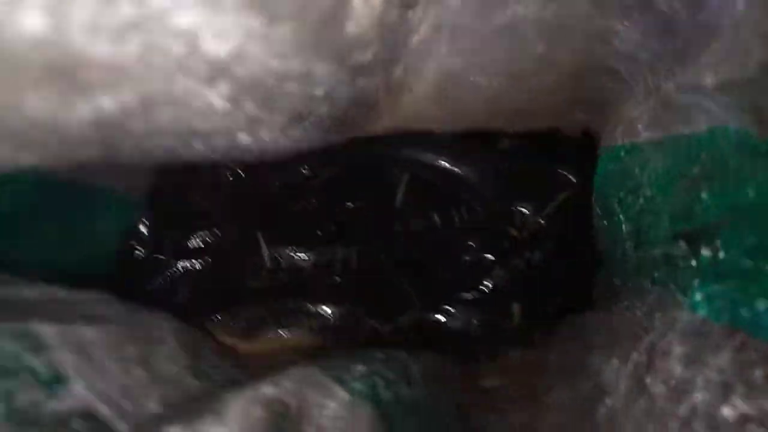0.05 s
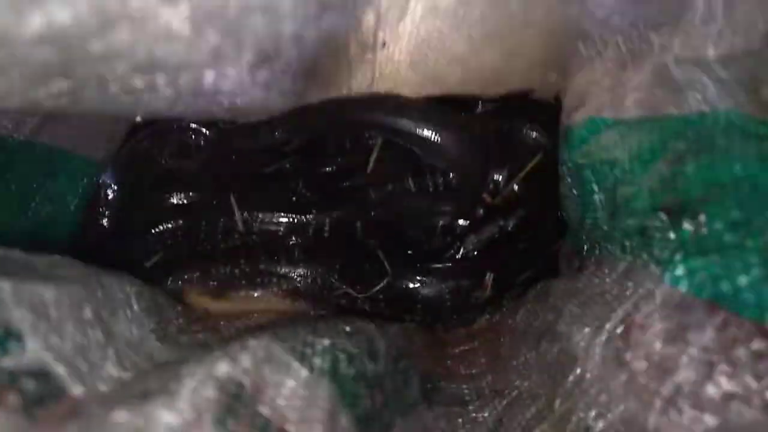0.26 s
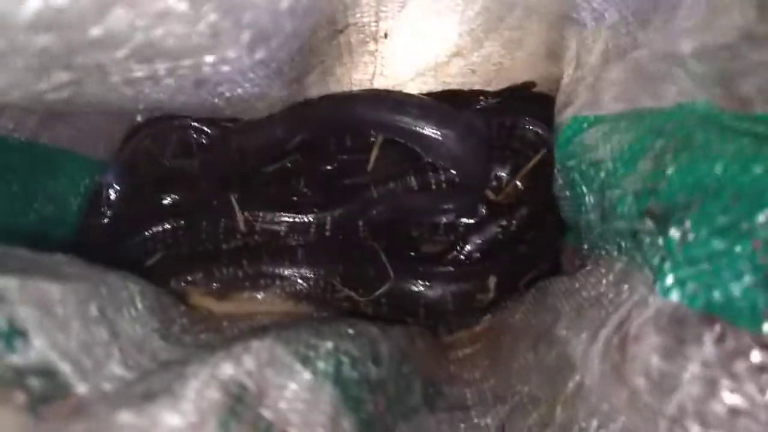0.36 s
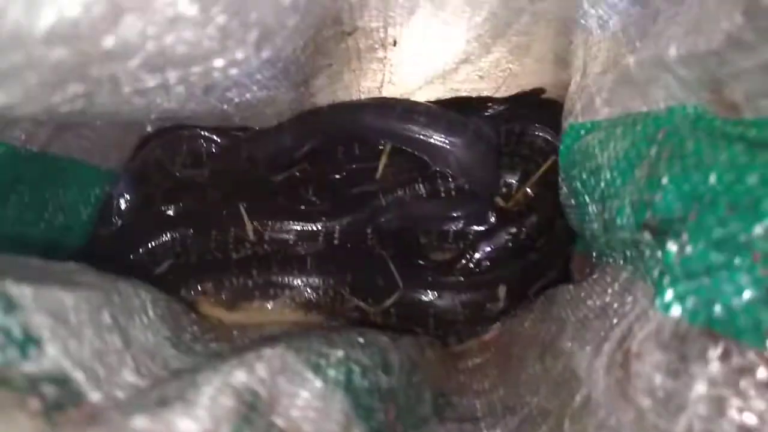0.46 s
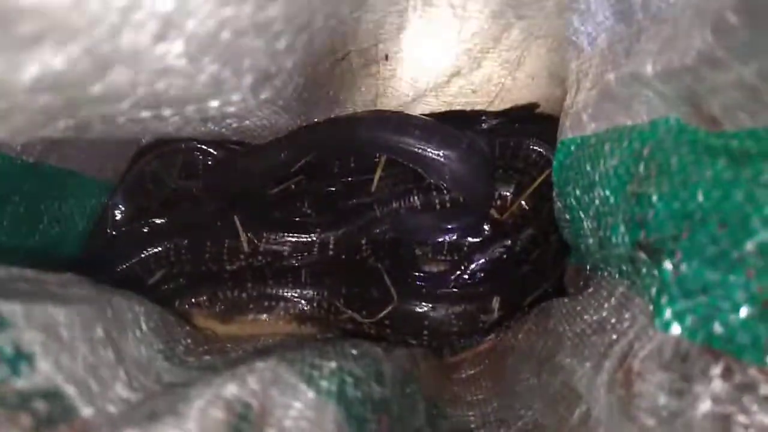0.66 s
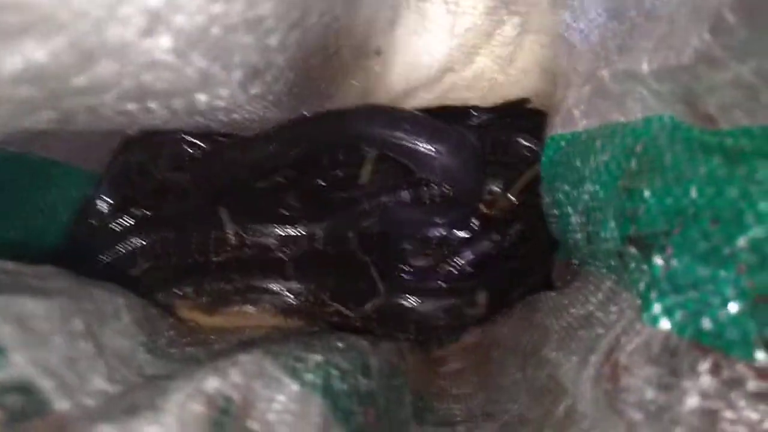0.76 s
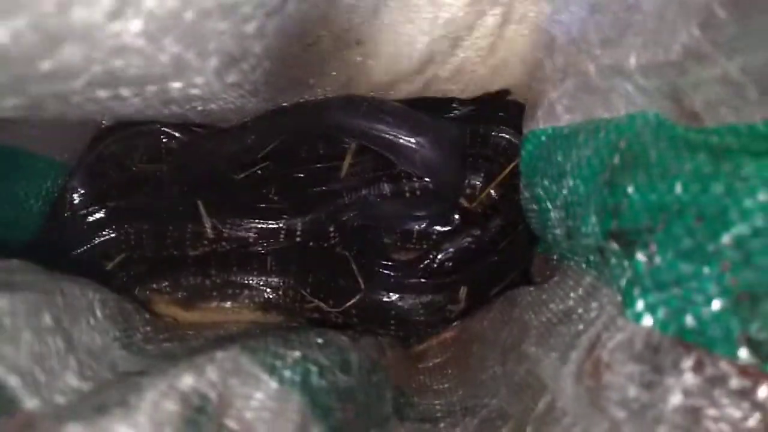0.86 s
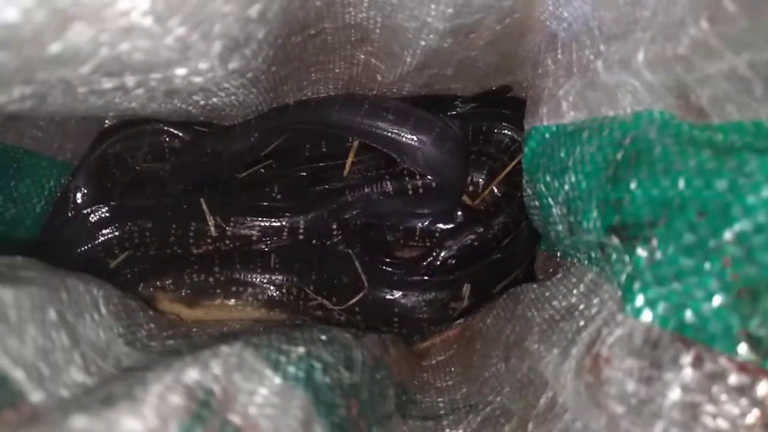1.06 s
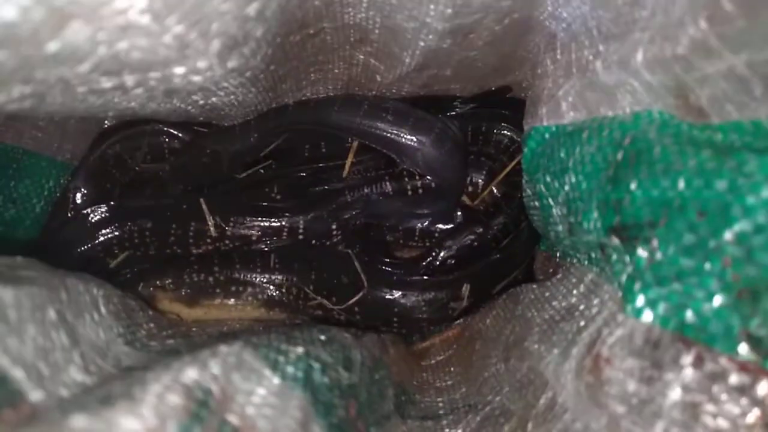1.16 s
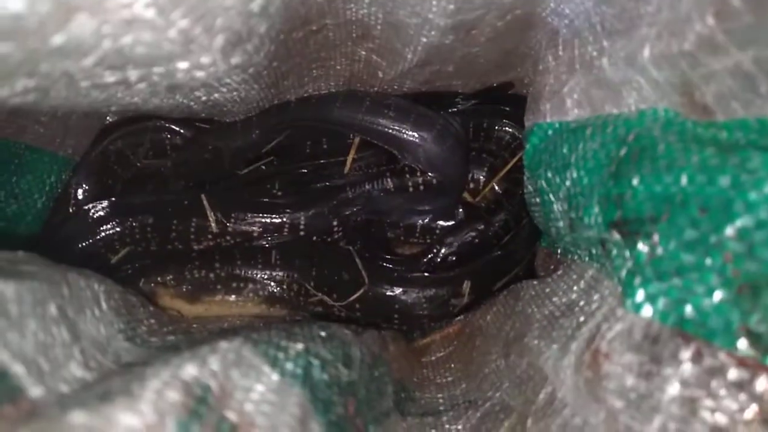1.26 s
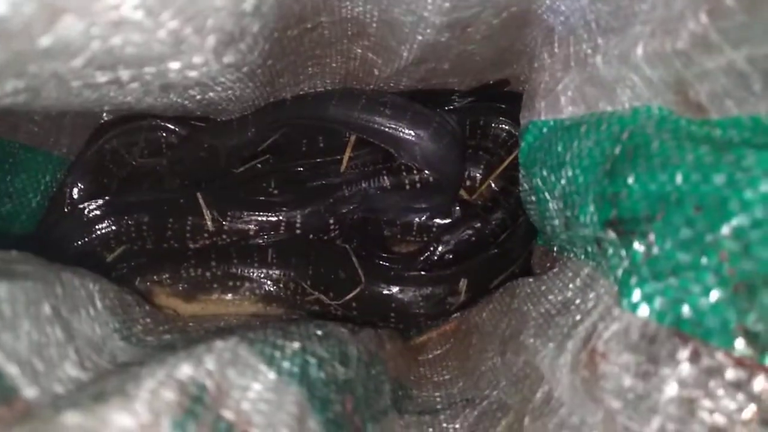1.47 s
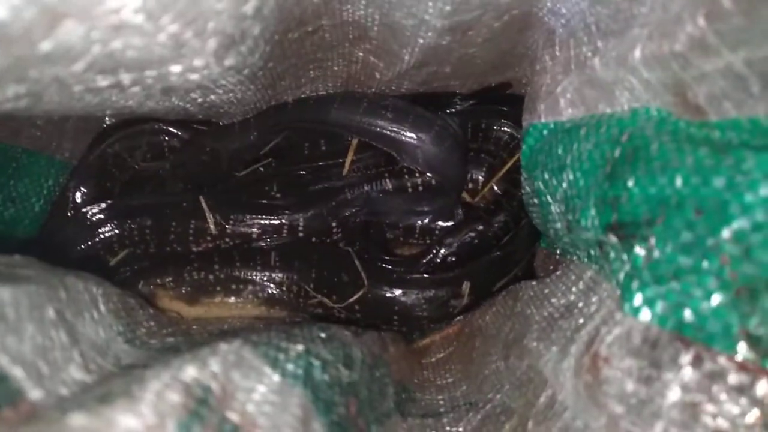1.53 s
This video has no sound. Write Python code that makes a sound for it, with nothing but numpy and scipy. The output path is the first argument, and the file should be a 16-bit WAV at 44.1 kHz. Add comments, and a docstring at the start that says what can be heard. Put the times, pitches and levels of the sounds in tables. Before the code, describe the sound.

Crickets chirp steadily at night, with a sharp microphone knock and light sack crinkles.

```python
"""Crickets sing at night around an open sack of fish, heard from a hand-held recorder.
Their wing strokes make short falling tones, scattered by plants; bush crickets buzz in swells.
A finger covers the right microphone, so the insects are on the left; on the right the finger
knocks, ticks and rasps over the port. The woven sack crinkles and the grip rumbles faintly."""
import sys
import numpy as np
from scipy import signal
from scipy.fft import rfft, irfft
from scipy.io import wavfile
from scipy.ndimage import uniform_filter1d

SR = 44100
rng = np.random.default_rng(int(sys.argv[2]) if len(sys.argv) > 2 else 0)


def store_pcm(level_fs):
    """Save levels as 16-bit WAV."""
    pcm = np.round(np.clip(level_fs, -1, 1) * 32767).astype(np.int16)
    wavfile.write(sys.argv[1], SR, np.atleast_2d(pcm).T)


N = 70560

# skin rubbing on the port (frequency [Hz], gain [dB])
SKIN_SPECTRUM = [(60, -22), (300, 1), (1000, -4), (1550, -5.5), (2150, 0), (2750, -3), (3500, -12.5),
                 (4500, -20), (8000, -38.5), (16000, -67)]
# woven plastic; also the knock's thin click (frequency [Hz], gain [dB])
SACK_SPECTRUM = [(150, -8.5), (1000, -10.5), (2200, -1.5), (3700, 3.5), (5000, 0.5), (6500, -1),
                 (8200, -0.5), (10000, -25), (13000, -22), (16000, -40)]


def near_crickets():
    """One cricket chirps in twos and threes, another pulses evenly; plants scatter both."""
    # (first syllable [s], syllables [count], level [dB])
    chirps = [(.461, 2, -50.5), (.648, 3, -49), (0.874, 3, -49), (1.092, 2, -47), (1.313, 3, -46.5),
              (1.533, 2, -46.5)]
    syllable_gap_s, pulse_gap_s, pulser_db = .033, .0843, -50
    chirper = sum(undb(db) * syllable(at + k * syllable_gap_s, hz=4975, width_s=.004, sag_hz_per_s=35000)
                  for at, count, db in chirps for k in range(count))
    chirper *= undb(2.5 * walk(900) - 1)  # fast level flutter
    pulser = sum(syllable(at, hz=7050, width_s=.0095, sag_hz_per_s=5600)
                 for at in np.arange(.022, N / SR, pulse_gap_s))
    return (scatter(chirper, wet_db=.5, decay_s=.009, delay_s=.004)
            + undb(pulser_db) * scatter(pulser, wet_db=-6, decay_s=.016, delay_s=.0022))


def syllable(at, hz, width_s, sag_hz_per_s):
    """One wing stroke: a tone that swells, fades more slowly and sags in pitch."""
    u = clock() - at
    envelope = np.exp(-(u / np.where(u < 0, width_s, 1.6 * width_s)) ** 2)
    return envelope * np.sin(2 * np.pi * (hz * u - sag_hz_per_s * u ** 2 / 2))


def chorus():
    """Far crickets trill in falling syllables, blurred by distance, over countless others."""
    # wash of insects and night air (frequency [Hz], gain [dB])
    night_spectrum = [(300, -30), (1000, -30.5), (1700, -35.5), (2700, -22), (3400, -27), (4100, -26),
                      (4800, -19), (5500, -16.5), (5900, -11.5), (6200, -4.5), (6950, -3.5), (7350, -21.5),
                      (8000, -15.5), (8900, -19), (9400, -48.5), (16000, -44.5)]
    # (pitch [Hz], syllable rate [1/s], level [dB])
    far_crickets = [(6280, 78, -58.5), (6820, 32, -65.5), (6570, 26, -63.5)]
    wash_db = -55.5 + 1.5 * walk(39)
    out = undb(wash_db) * noise(night_spectrum)
    for hz, per_s, db in far_crickets:
        stroke_phase = (rng.random() + np.cumsum(per_s * (1 + .033 * walk(3.7))) / SR) % 1
        pitch_hz = hz * (1 - .093 * (stroke_phase - .5) + .00398 * walk(90))
        trill = np.sin(np.pi * stroke_phase) ** 2 * np.sin(2 * np.pi * np.cumsum(pitch_hz) / SR)
        out += undb(db) * unit(scatter(trill, wet_db=2, decay_s=.028, delay_s=.001))
    return out


def bush_crickets():
    """Narrow bands of buzz that swell regularly."""
    # (pitch [Hz], bandwidth [Hz], one crest [s], period [s], crest level [dB])
    buzzers = [(8400, 360, 1.085, .088, -62.5), (5874, 570, 1.24, .275, -66.5)]
    out = np.zeros(N)
    for hz, width_hz, crest_s, period_s, db in buzzers:
        band = signal.butter(2, [hz - width_hz / 2, hz + width_hz / 2], "band", fs=SR, output="sos")
        buzz = unit(signal.sosfilt(band, rng.standard_normal(N)))
        swell = np.cos(np.pi * (clock() - crest_s) / period_s) ** 2
        out += undb(db) * swell * buzz
    return out


def finger_knock():
    """The finger strikes the right port: a ring, a push of air, soft bumps; a thin click on the left."""
    # strike and rebound (time [s], level [dB])
    knocks = [(.21805, 4.5), (.22135, -10)]
    # (frequency [Hz], gain [dB], time to crest [s])
    port_modes = [(640, -9, 0.00029), (2478, 0.5, 0.00022), (4033, -12.5, 0.00034), (8980, -31, 0.00032)]
    # air into the port (time [s], level [dB], decay [s])
    pushes = [(0.2186, -3.5, 0.0021), (0.2247, -26.5, 0.014)]
    # soft hand bumps (time [s], level [dB], pitch [Hz], time to crest [s])
    bumps = [(.0062, -36, 884, 0.0017), (0.0682, -24.5, 192, 0.0015), (0.2309, -26.5, 290, 0.0011)]
    push_rise_s = .00021
    port = sum(ring(at, db + mode_db, hz, crest_s)
               for at, db in knocks for hz, mode_db, crest_s in port_modes)
    for at, db, decay_s in pushes:
        u = np.maximum(clock() - at, 0)
        port += undb(db) * (np.exp(-u / decay_s) - np.exp(-u / push_rise_s))
    port += sum(ring(*bump) for bump in bumps)
    left_contacts = by_force([(at + .0005, db - 22.5) for at, db in knocks])
    click = ticks(left_contacts, SACK_SPECTRUM, tail_db=31, tail_s=.0015, vary_db=0)
    return np.array([click, port])


def finger_taps():
    """Light, dry ticks on the case beside the right port."""
    # (time [s], peak [dB])
    contacts = [(.0070, -25), (.0842, -29), (.0982, -14.5), (.1145, -33), (.1354, -31), (.1515, -31),
                (.1832, -28), (.1919, -28), (.9700, -38), (.9871, -29)]
    # (frequency [Hz], gain [dB])
    case_spectrum = [(80, -5.5), (600, 3.5), (1200, -6), (2300, 1.5), (3300, -2.5), (4500, -7.5),
                     (6500, -21.5), (9000, -29), (16000, -45)]
    leak_db = -27.5
    taps = ticks(by_force(contacts), case_spectrum, tail_db=-2, tail_s=.001, vary_db=1)
    return np.array([undb(leak_db) * taps, taps])


def finger_slides():
    """Skin catches and slips over the right port in a dense rasp."""
    # (start [s], attack [s], hold [s], release [s], level [dB], change over hold [dB])
    slides = [(0.545, 0.03, 0.018, 0.017, -47, 0.5), (0.629, 0.0094, 0.103, 0.03, -62, 5),
              (0.725, 0.045, 0.11, 0.02, -33, -10), (0.991, 0.0071, 0.032, .015, -68.5, 7),
              (1.09, 0.025, 0.053, 0.032, -64.5, 1), (1.163, 0.033, 0.011, 0.03, -51, 0.5),
              (1.373, 0.0085, 0.013, 0.026, -52, 1.5)]
    leak_db = -25.5
    pressure = np.zeros(N)
    for at, attack_s, hold_s, release_s, db, change_db in slides:
        corners_s = at + np.cumsum([0, attack_s, hold_s, release_s])
        pressure += undb(db) * np.interp(clock(), corners_s, [0, 1, undb(change_db / 2), 0]) ** 2
    left, right = [unit(colour(grains(per_s=5400, spread_db=-2), SKIN_SPECTRUM)) for _ in range(2)]
    return pressure * np.array([undb(leak_db) * left, right])


def sack():
    """Woven plastic snaps and rustles as it settles; one fold slips with a soft, high swish."""
    # (time [s], peak [dB], tilt [dB/octave])
    crinkles = [(.0073, -26.5, 0), (.0716, -30.5, -1.5), (.0974, -29.5, -2.5), (.1362, -34, 1),
                (.2308, -26.5, -6), (.4009, -30, -2.5), (.4078, -36.5, 1), (.4251, -22.5, 7),
                (.4422, -30, -2), (.7904, -33, -1.5), (.8538, -31, -1.5), (.9872, -37.5, 4.5),
                (1.0258, -44, 0.5), (1.2350, -49.5, -0.5), (1.2742, -46.5, -11), (1.5900, -33, 3.5)]
    # (time [s], level [dB])
    rustle_levels = [(0, -51), (.14, -58.5), (.37, -61.5), (.412, -50.5), (.47, -62.5), (1.02, -72.5),
                     (1.1, -80)]
    swish_at_s, swish_decay_s, swish_db = .513, .022, -51
    t = clock()
    rustle_db = np.interp(t, *np.array(rustle_levels).T)
    rustle = undb(rustle_db) * unit(colour(grains(per_s=900, spread_db=3), SACK_SPECTRUM))
    slip = (t > swish_at_s) * np.exp(-np.abs(t - swish_at_s) / swish_decay_s)
    swish = undb(swish_db) * slip * noise(tilted(SACK_SPECTRUM, db_per_octave=3))
    snaps = ticks(crinkles, SACK_SPECTRUM, tail_db=7.5, tail_s=.0013, vary_db=1)
    return snaps + rustle + swish


def grip():
    """The hand rumbles through the case; the resting finger creeps on the port with a faint hiss."""
    # (time [s], left level [dB], right level [dB])
    rumble_levels = [(0, -51, -33.5), (.12, -50.5, -37), (.27, -50.5, -40.5), (.58, -49.5, -42.5),
                     (0.841, -50, -45.5), (1.1, -52.5, -49.5), (1.6, -52, -48.5)]
    # (frequency [Hz], gain [dB])
    rumble_spectrum = [(10, 3.5), (28, 4), (50, -13), (110, -13), (260, -19), (500, -28.5), (1000, -41),
                       (3000, -81)]
    times_s, *sides_db = np.array(rumble_levels).T
    left_db, right_db = [np.interp(clock(), times_s, db) for db in sides_db]
    left, right = [undb(db) * noise(rumble_spectrum) for db in (left_db, right_db)]
    hiss_db = -74 + 1.3 * (right_db - right_db[-1]) + 2 * walk(21)
    return np.array([left, right + undb(hiss_db) * noise(SKIN_SPECTRUM)])


def ticks(contacts, spectrum, tail_db, tail_s, vary_db):
    """Sharp contacts ring a body briefly, each with its own tilt and random tint."""
    t, out = clock(), np.zeros(N)
    for at, db, db_per_octave in contacts:
        tail = rng.standard_normal(N) * np.exp(-t / tail_s)
        tint = tilted(spectrum, db_per_octave)
        tint[:, 1] += vary_db * rng.standard_normal(len(spectrum))
        click = colour((t == 0) + undb(tail_db) * tail / np.linalg.norm(tail), tint)
        start = int(at * SR)
        out[start:] += undb(db) * click[:N - start] / np.abs(click).max()
    return out


def by_force(contacts, neutral_db=-25.5):
    """Harder is brighter: append a tilt [dB/octave] to each (time [s], level [dB])."""
    return [(at, db, .069 * (db - neutral_db)) for at, db in contacts]


def ring(at, db, hz, crest_s):
    """Damped mode that swells to its crest and dies away."""
    u = np.maximum(clock() - at, 0)
    return -undb(db) * u / crest_s * np.exp(1 - u / crest_s) * np.sin(2 * np.pi * hz * u)


def scatter(x, wet_db, decay_s, delay_s):
    """Add a dense, fading tail of reflections."""
    t = clock()
    tail = rng.standard_normal(N) * np.exp(-t / decay_s) * (t > delay_s)
    return x + undb(wet_db) * signal.fftconvolve(x, tail / np.linalg.norm(tail))[:N]


def grains(per_s, spread_db):
    """Random tiny impulses of uneven size."""
    impulses = (rng.random(N) < per_s / SR) * rng.standard_normal(N)
    size_db = spread_db * np.minimum(rng.exponential(size=N), 4)
    return unit(impulses * undb(size_db))


def noise(spectrum):
    """Coloured noise, rms 1."""
    return unit(colour(rng.standard_normal(N), spectrum))


def colour(x, spectrum):
    """Minimum-phase filter through (frequency [Hz], gain [dB]) points."""
    hz, db = np.array(spectrum).T
    bins_hz = np.maximum(np.arange(N + 1) * SR / (2 * N), 1)
    gain = undb(np.interp(np.log(bins_hz), np.log(hz), db))
    cepstrum = irfft(np.log(gain))
    cepstrum[1:N] *= 2
    cepstrum[N + 1:] = 0
    return irfft(rfft(x, 2 * N) * np.exp(rfft(cepstrum)))[:N]


def tilted(spectrum, db_per_octave):
    """Spectrum with an added slope."""
    hz, db = np.array(spectrum).T
    return np.column_stack([hz, db + db_per_octave * np.log2(hz / hz[0])])


def walk(rate_hz):
    """Smooth random wander, rms 1."""
    hold = int(SR / rate_hz)
    steps = np.repeat(rng.standard_normal(N // hold + 1), hold)
    return unit(uniform_filter1d(uniform_filter1d(steps, hold), hold)[:N])


def undb(db):
    """Decibels to gain."""
    return 10 ** (np.asarray(db) / 20)


def unit(x):
    """Scale to rms 1."""
    return x / np.sqrt(np.mean(x ** 2))


def clock():
    """Sample times [s]."""
    return np.arange(N) / SR


def scene():
    """Insects and sack at the open left port, handling mostly at the covered right one."""
    # path past the finger (frequency [Hz], gain [dB])
    covered_response = [(2500, -8), (5000, -21), (6500, -35), (8500, -35)]
    outside = near_crickets() + chorus() + bush_crickets() + sack()
    ports = np.array([outside, colour(outside, covered_response)])
    return ports + finger_slides() + finger_taps() + finger_knock() + grip()


def record(dry):
    """The knock overloads the recorder; a low-pass cuts the top."""
    top_hz = 16500
    lowpass = signal.ellip(8, .2, 70, top_hz, fs=SR, output="sos")
    return signal.sosfilt(lowpass, np.clip(dry, -1, 1))


dry = scene()
out = record(dry)
store_pcm(out)
```